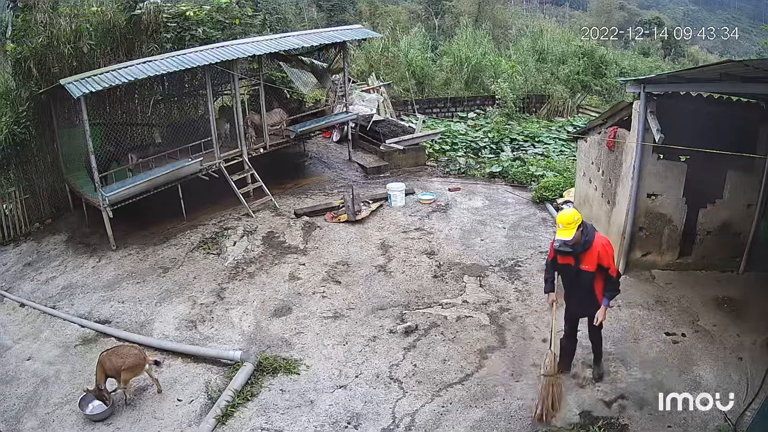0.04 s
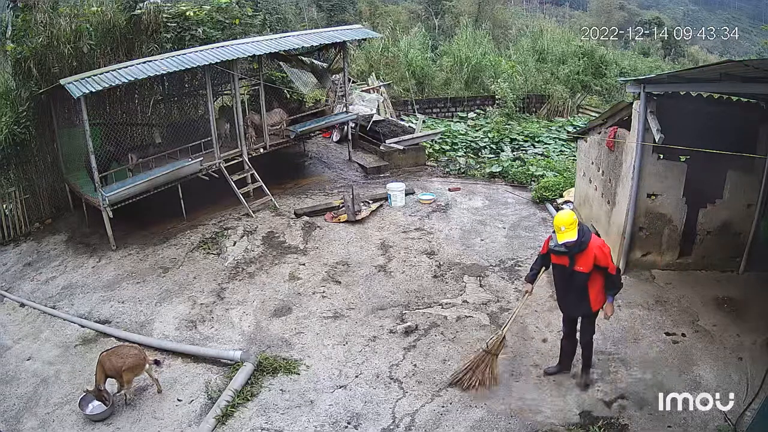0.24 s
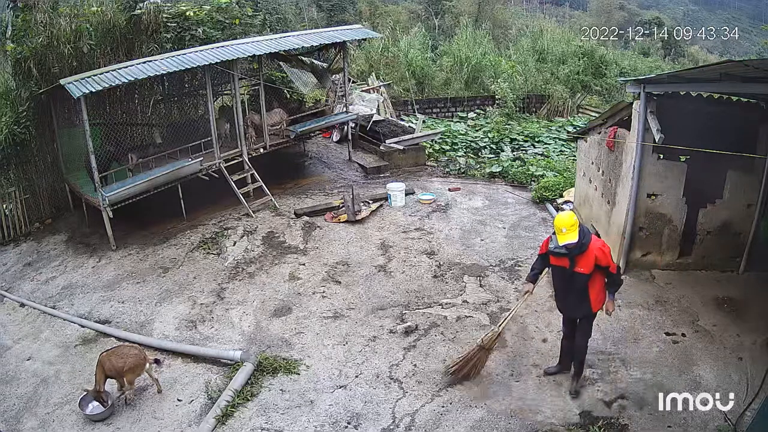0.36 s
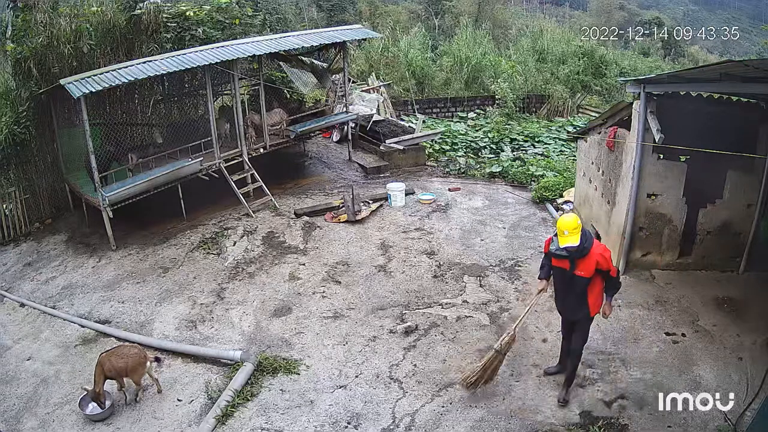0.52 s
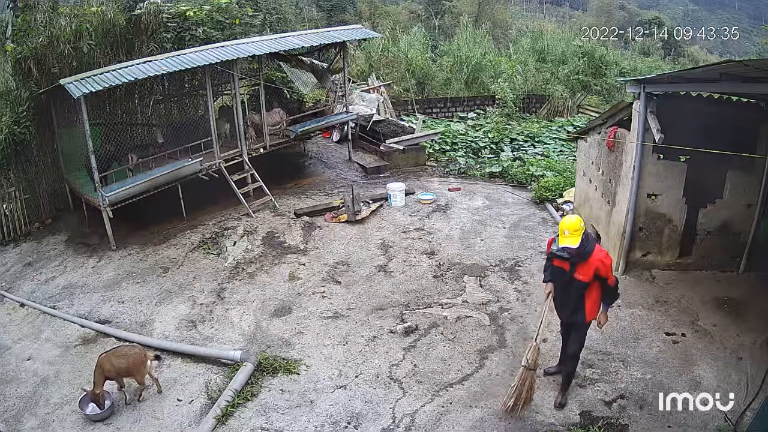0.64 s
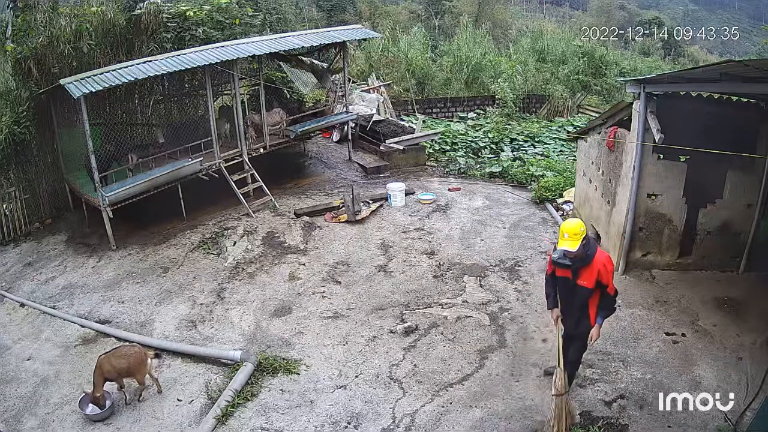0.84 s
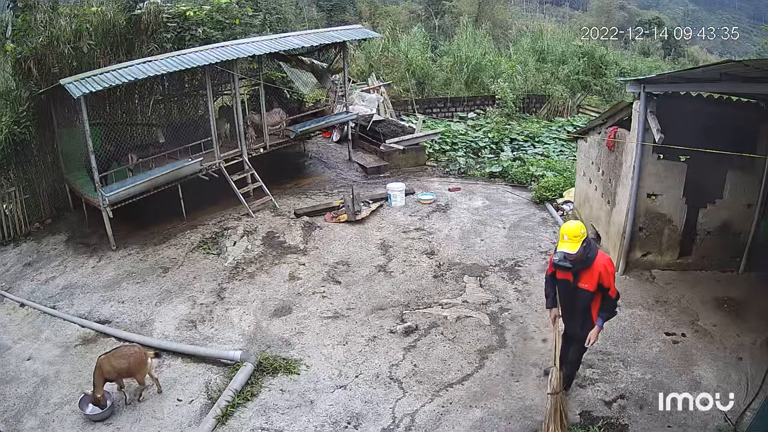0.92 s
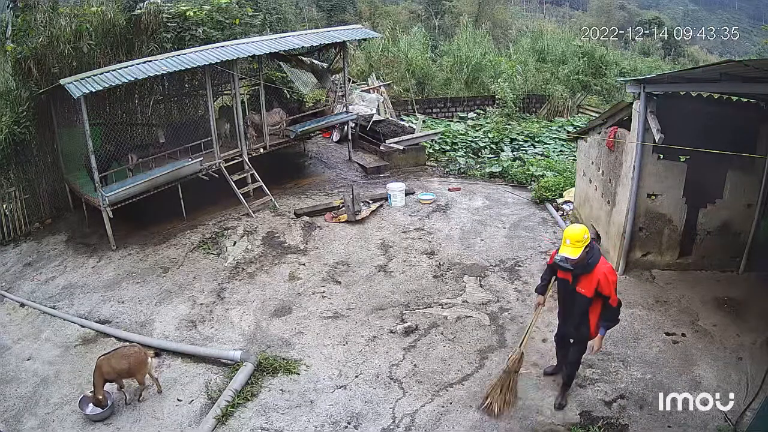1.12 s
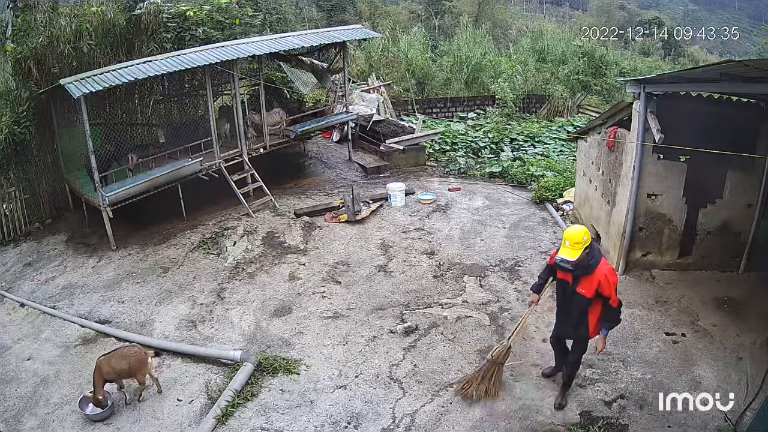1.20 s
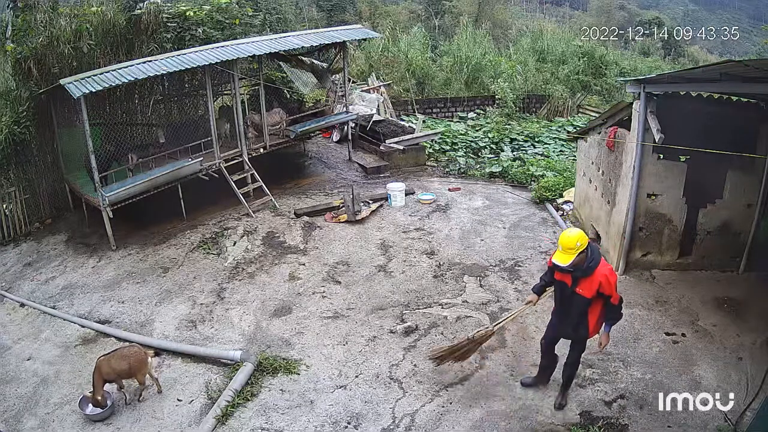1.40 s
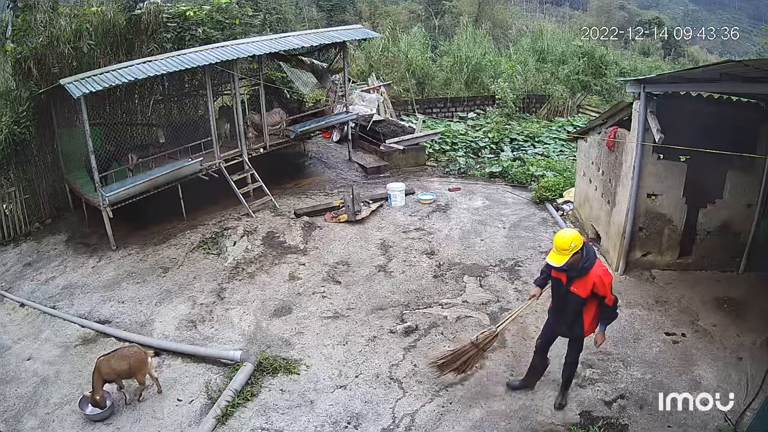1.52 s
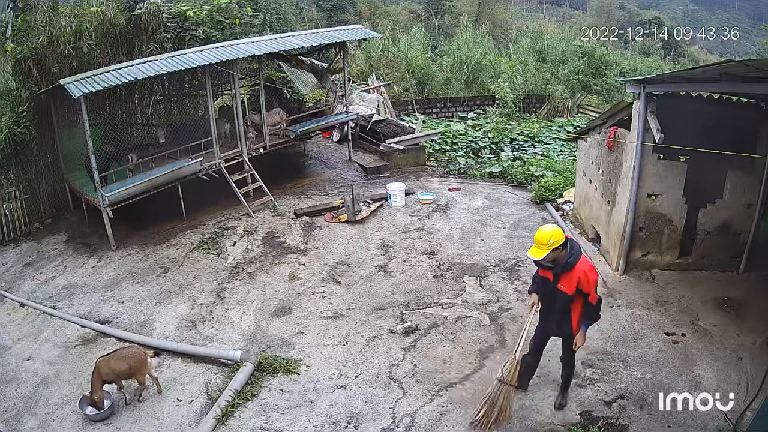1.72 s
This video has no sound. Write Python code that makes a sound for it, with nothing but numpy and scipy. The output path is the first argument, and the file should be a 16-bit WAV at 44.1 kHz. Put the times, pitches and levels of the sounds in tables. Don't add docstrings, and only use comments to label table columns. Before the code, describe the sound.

Broom sweeping in an open farmyard: one dry, raspy scrape, a pause with a light touch-down, then a second similar scrape. Soft handle knocks and faint far-off clucks; distant, compressed, band-limited microphone sound.

```python
import sys
import numpy as np
from scipy import signal
from scipy.io import wavfile

SR = 44100
rng = np.random.default_rng(int(sys.argv[2]) if len(sys.argv) > 2 else 0)


def decibels_to_gain(level_db):
    exponent = np.asarray(level_db, float) / 20
    return 10 ** exponent


def transcribe(signal):
    frames = np.atleast_2d(signal).T
    limited = np.clip(frames, -1, 1)
    pcm = np.round(limited * 32767).astype(np.int16)
    wavfile.write(sys.argv[1], SR, pcm)


N = 77175
T = np.arange(N) / SR


def rms_one(x):
    return x / np.sqrt(np.mean(x ** 2) + 1e-20)


def at_hz(points, hz):
    table = np.array(points)
    return np.interp(np.log(hz), np.log(table[:, 0]), table[:, 1])


def drift(rate_hz):
    r = np.exp(-2 * np.pi * rate_hz / SR)
    white = rng.standard_normal(N + SR)
    return rms_one(signal.lfilter([1], [1, -2 * r, r * r], white)[SR:])


def resonance(x, hz, width_hz):
    r = np.exp(-np.pi * width_hz / SR)
    zeros = [(1 - r * r) / 2, 0, (r * r - 1) / 2]
    poles = [1, -2 * r * np.cos(2 * np.pi * hz / SR), r * r]
    return signal.lfilter(zeros, poles, x + 1e-18)


def bump(start, length):
    return np.sin(np.pi * np.clip((T - start) / length, 0, 1))


def band_pass(x, order, low_hz, high_hz):
    return signal.sosfilt(signal.butter(order, [low_hz, high_hz], "band", fs=SR, output="sos"), x)


def yard():
    # frequency in Hz, level in dB per Hz.
    hiss_colour = [(18, -31), (30, -10.5), (294, -9.5), (386, -10.5), (583, -9.5), (1180, -13.5),
                   (1660, -18), (2040, -15), (7010, -35.5), (9110, -64), (15400, -120)]
    hiss_db, hum_db = -55.5, -63
    edges = 30 * 2 ** np.arange(0, 8.1, 1 / 3)
    white = rng.standard_normal((2, N))
    hiss = 0
    for k, (low, high) in enumerate(zip(edges, edges[1:])):
        patchy_db = at_hz(hiss_colour, np.sqrt(low * high)) + 0.5 * drift(33)
        hiss = hiss + decibels_to_gain(patchy_db) * band_pass(white[k % 2], 2, low, high)
    hum = resonance(rng.standard_normal(N), 48.7, 2.7)
    return decibels_to_gain(hiss_db) * rms_one(hiss) + decibels_to_gain(hum_db) * rms_one(hum)


def breathy_tones(rows):
    out = 0
    for start, length, hz, db in rows:
        tone = np.sin(2 * np.pi * hz * (T - start))
        breath = rms_one(resonance(rng.standard_normal(N), hz, 25.0))
        out = out + decibels_to_gain(db) * bump(start, length) ** .5 * (tone + .6 * breath)
    return out


def far_hens():
    # start in seconds, length in seconds, pitch in Hz, level in dB.
    cluck_rows = [(.062, .03, 1443, -41.5), (0.07, 0.042, 910, -54), (.607, .072, 875, -45.5),
                  (.5, .07, 870, -35.5), (.70, 0.039, 2100, -58), (0, .03, 2020, -53),
                  (0.79, 0.058, 3790, -61.5), (.8, 0.028, 3600, -72), (.72, 0.052, 590, -58.5),
                  (0.814, 0.041, 630, -56), (0.839, .025, 286, -53.5), (0.906, 0.034, 5270, -67),
                  (1.584, 0.063, 1050, -53), (1.66, 0.031, 250, -53.5), (0.12, 0.01, 5270, -53.5)]
    return breathy_tones(cluck_rows)


def handle_knocks():
    # start in seconds, length in seconds, pitch in Hz, level in dB.
    knock_rows = [
        (0.48, 0.017, 180, -43),
        (.47, .06, 245, -37.5),
        (1, 0.031, 340, -53),
        (1.2, 0.021, 295, -39.5),
        (0.38, 0.12, 480, -46.5),
    ]
    return breathy_tones(knock_rows)


def handle_rumble(level_db):
    # mode frequency in Hz, width in Hz, level in dB.
    modes = [(168, 40, -12), (241, 71, -4.5), (316, 40, -1), (512, 120, -1)]
    out = 0
    for hz, width_hz, db in modes:
        mode = rms_one(resonance(rng.standard_normal(N), hz, width_hz))
        out = out + decibels_to_gain(db + 2.5 * drift(36)) * mode
    top_db = level_db.max()
    rumble_db = top_db - 29 + 1.2 * (level_db - top_db)
    return decibels_to_gain(rumble_db) * rms_one(out)


def twigs(level_db, tilt_db):
    # frequency in Hz, level in dB per Hz.
    scrape = [(600, -23.5), (950, -9), (1500, 1), (3000, -2), (4500, -8.5), (6150, -2), (6450, -12.5),
              (7250, -10)]
    # frequency in Hz, width in Hz, boost in dB.
    housing = [(1440, 400, 5.5), (2253, 75, 8), (3082, 230, 11.5), (3967, 540, 5), (4510, 300, 5),
               (5500, 980, 8.5), (2653, 87, -29), (3570, 570, -6), (1857, 200, -5), (857, 120, 3.5),
               (983, 150, 5.5)]
    skips_per_s, skips_follow = 30000, .2
    size_spread_db, flutter_db, clump_db = 2.0, 2.5, 1.22
    twig_cycles = 20.0

    rate = skips_per_s * decibels_to_gain(skips_follow * (level_db - level_db.max()))
    sizes = decibels_to_gain(size_spread_db * np.minimum(rng.exponential(1, N), 4)) * rng.choice([-1, 1], N)
    happens = rng.random(N) < rate / SR
    skips = sizes * happens / np.sqrt(rate)

    pitches = np.geomspace(650, 7300, 44)
    dealt = rng.integers(0, 44, N)
    out = 0
    for k, hz in enumerate(pitches):
        brightness_db = np.clip(tilt_db, -3, 3) * np.log2(hz / 3000)
        gain = decibels_to_gain(at_hz(scrape, hz) + brightness_db + flutter_db * drift(9))
        out = out + gain * resonance(skips * (dealt == k), hz, hz / twig_cycles)
    out = signal.sosfilt(signal.butter(3, 800, "high", fs=SR, output="sos"), out)
    for hz, width_hz, boost_db in housing:
        out = out + (decibels_to_gain(boost_db) - 1) * resonance(out, hz, width_hz)
    clumped_db = level_db + 0.5 + clump_db * drift(18)
    return decibels_to_gain(clumped_db) * rms_one(out)


def scene():
    # time in seconds, level in dB, brightness in dB per octave.
    strokes = [
        [(.1, -62.5, 0.5), (.194, -23.5, 1.3), (.268, -29, 1.5), (.346, -11.5, -1.0), (.46, -14, -0.7),
         (.556, -24, -0.26), (.6, -41, 0.5), (.655, -54.5, 1), (.685, -71, 0.5)],
        [(1.005, -71, 0.5), (1.03, -45, -2.5), (1.054, -36.5, -1.5), (1.112, -49, 3)],
        [(1.135, -43.5, 1), (1.165, -30.5, 0.0), (1.21, -26, -1), (1.275, -15.5, -0.1), (1.351, -12, -1.13),
         (1.468, -14.5, -0.34), (1.545, -34.5, -.6), (1.6, -52.5, -2), (1.65, -70, -0.5)],
    ]
    rows = sorted(tuple(row) for stroke in strokes for row in stroke)
    s, level, tilt = np.transpose(rows)
    level_db, tilt_db = np.interp(T, s, level), np.interp(T, s, tilt)
    background = yard() + far_hens()
    broom = handle_knocks() + handle_rumble(level_db) + twigs(level_db, tilt_db)
    return (background + broom)[None]


def camera_rounding(x):
    hop, line_count, band_lines = 512, 176, 8
    coarseness, spread_db, mask_db = 1.9, 2.5, -14
    n, k = np.arange(2 * hop)[:, None] + .5, np.arange(line_count) + .5
    window = np.sin(np.pi * n / (2 * hop))
    basis = np.sqrt(2 / hop) * window * np.cos(np.pi / hop * (n + hop / 2) * k)
    count = N // hop + 2
    halves = np.pad(x, (hop, (count + 1) * hop - N - hop)).reshape(-1, hop)
    lines = np.hstack([halves[:-1], halves[1:]]) @ basis
    lines = lines.reshape(count, -1, band_lines)

    level = np.sqrt(np.mean(lines ** 2, axis=2, keepdims=True))
    beside = np.maximum(np.roll(level, 1, axis=0), np.roll(level, -1, axis=0))
    masked = np.maximum(level, decibels_to_gain(mask_db) * beside)
    uneven = decibels_to_gain(spread_db * np.clip(rng.standard_normal(level.shape), -2, 2))
    step = coarseness * masked * uneven + 1e-12
    step[:, :2] /= 6
    rounded = np.sign(lines) * np.floor(np.abs(lines) / step + .45) * step * 1.058
    frames = rounded.reshape(count, -1) @ basis.T
    return (frames[1:, :hop] + frames[:-1, hop:]).ravel()[:N]


def camera_dropouts(x):
    # start in seconds, length in seconds, low edge in Hz, high edge in Hz.
    gaps = [(.106, .012, 3600, 7600), (.108, .022, 6300, 7600), (.112, .014, 3500, 4100),
            (.128, .012, 2500, 2900), (.648, .032, 2300, 2900), (.655, .025, 3600, 4500),
            (.66, .022, 4500, 7600), (.66, .012, 1700, 2100), (1.0, .017, 2300, 7600),
            (1.008, .018, 3400, 3900), (1.008, .018, 4500, 5000), (1.008, .016, 6200, 6700),
            (1.548, .024, 1700, 2000), (1.553, .02, 2350, 2800), (.297, .022, 1700, 2050),
            (.29, .085, 10, 90), (.495, .05, 10, 90), (1.258, .11, 10, 90), (1.415, .072, 10, 90),
            (1.35, .07, 380, 700), (.172, .025, 1800, 2100), (1.133, .014, 2300, 2700),
            (.66, .36, 6450, 6750), (.96, .04, 6700, 7600), (.795, .03, 6700, 7600),
            (1.497, .014, 2300, 2800), (-.03, .14, 6450, 6900), (1.61, .2, 6450, 7600),
            (.6, .05, 6250, 6650)]
    for start, length, low_hz, high_hz in gaps:
        band = signal.butter(3, [low_hz, high_hz], "band", fs=SR, output="sos")
        depth = .97 * np.minimum(2 * bump(start, length), 1)
        x = x - depth * signal.sosfiltfilt(band, x)
    return x


def sampling_mirror(x):
    mirror = band_pass(x * np.cos(2 * np.pi * 16000 * T), 2, 8720, 8900)
    return x + decibels_to_gain(-21.5) * mirror


def band_limit(x):
    return signal.sosfilt(signal.butter(12, 9600, fs=SR, output="sos"), x)


def record(dry):
    x = camera_dropouts(camera_rounding(dry[0]))[None]
    overload = .75
    x = x / (1 + (x / overload) ** 4) ** .25
    x = signal.sosfilt(signal.ellip(7, .5, 26, 7240, fs=SR, output="sos"), x)
    x = signal.sosfilt(signal.ellip(12, .3, 70, 7550, fs=SR, output="sos"), x)
    return band_limit(sampling_mirror(x))


dry = scene()
out = record(dry)
transcribe(out)
```